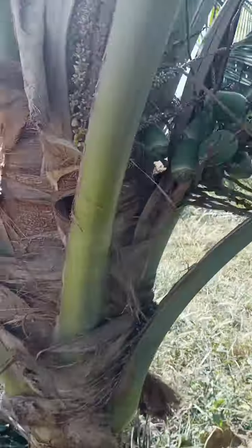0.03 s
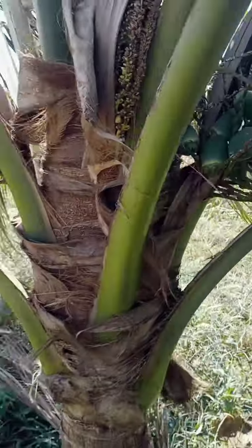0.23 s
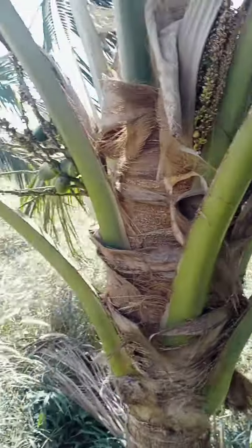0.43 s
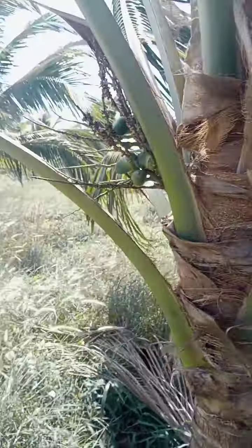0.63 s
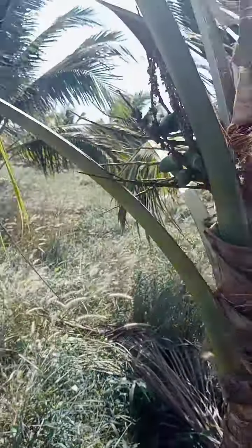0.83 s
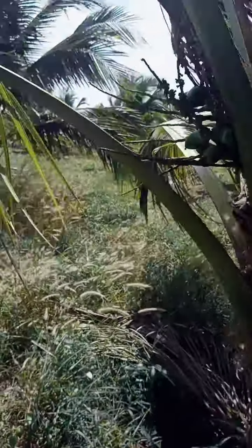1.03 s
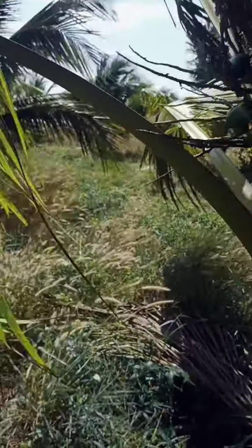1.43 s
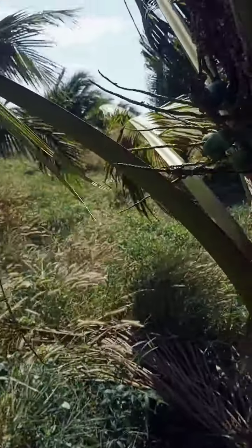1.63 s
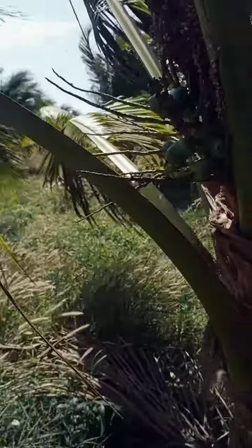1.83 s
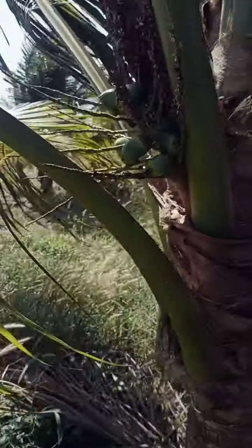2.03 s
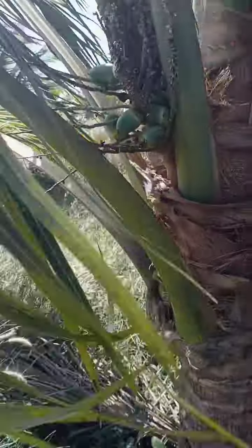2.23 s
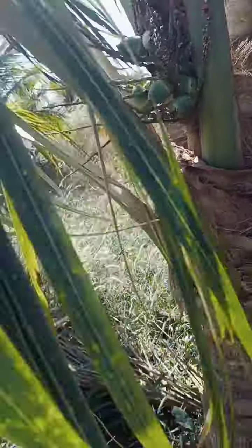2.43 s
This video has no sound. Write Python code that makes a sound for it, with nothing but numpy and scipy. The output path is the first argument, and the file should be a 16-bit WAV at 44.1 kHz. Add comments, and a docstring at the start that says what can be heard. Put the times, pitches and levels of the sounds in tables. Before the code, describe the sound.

Wind buffets the microphone in uneven, low gusts among palm fronds in a grassy field. The leaves hiss steadily, with a few close ticks and scrapes, before the strongest gust hits and dies away.

```python
"""A leafy hiss and a low rumble of wind, heard among the fronds of a coconut palm in a grassy field. Leaflets
hiss and tick as they touch one another, and a few close ones scrape or snap. Gusts sweep turbulent eddies over
the microphone, which picks up their pressure as buffeting. Twice, slow pushes of air too low to hear drive a
limiter, which ducks the rustle along with the wind."""
import sys
import numpy as np
from scipy import signal
from scipy.fft import rfft, irfft
from scipy.io import wavfile
from scipy.ndimage import uniform_filter1d, minimum_filter1d, map_coordinates

SR = 44100
rng = np.random.default_rng(int(sys.argv[2]) if len(sys.argv) > 2 else 0)


def master(y):
    """Save y as 16-bit WAV."""
    cut = np.clip(np.atleast_2d(y).T, -1, 1)
    pcm = np.round(cut * 32767)  # scale
    wavfile.write(sys.argv[1], SR, pcm.astype(np.int16))


N = 114660

# spectrum of leaflets in contact: frequency_hz, gain_db
LEAF_SPECTRUM = [(60, 8), (300, -8), (700, -3.5), (1300, -3.5), (2000, -1), (2700, -0.5), (3800, -.5),
                 (4400, -6.5), (5000, -11.5), (6200, -8.5), (7400, -6), (8500, -0.5), (9400, -6.5),
                 (10500, -14), (12500, -19.5), (15500, -20.5)]


def amp(db):
    """Amplitude ratio of a level: tenfold for every 20 dB."""
    return 10 ** (np.asarray(db) / 20)


def unit(x):
    """Normalisation to an rms of 1."""
    return x / np.sqrt(np.mean(x ** 2) + 1e-20)


def follow(rows):
    """Linear interpolation of each column of a time table, sample by sample."""
    time_s, *columns = np.transpose(rows)
    return [np.interp(np.arange(N) / SR, time_s, column) for column in columns]


def colour(x, points, scale=1):
    """Spectral shaping by a gain curve in dB, whose frequencies are multiplied by scale."""
    frequency, gain_db = np.transpose(points)
    hz = np.fft.rfftfreq(len(x), 1 / SR) + 1e-3
    return irfft(rfft(x) * amp(np.interp(np.log(hz), np.log(frequency * scale), gain_db)), len(x))


def wander(cutoff_hz):
    """Low-passed noise: a smooth random fluctuation with an rms of 1."""
    lowpass = np.exp(-(np.fft.rfftfreq(N, 1 / SR) / cutoff_hz) ** 2)
    return unit(irfft(rfft(rng.standard_normal(N)) * lowpass, N))


def bump(centre_s, half_s):
    """A Gaussian pulse that falls to 1/e at half_s from its centre."""
    return np.exp(-((np.arange(N) / SR - centre_s) / half_s) ** 2)


def contacts(per_s, spread_db, decay_s):
    """Shot noise: random touches each excite a decaying burst, a few far louder than the rest."""
    touches = (rng.random(N) < per_s / SR) * amp(spread_db * np.minimum(rng.exponential(1, N), 4))
    envelope = signal.lfilter([1], [1, -np.exp(-1 / (decay_s * SR))], touches)
    return unit(envelope * rng.standard_normal(N))


def rustle():
    """Incoherent summation: many far leaflets merge into hiss, while nearer ones tick and crackle."""
    # rustle of the crown: time_s, level_db, extra_treble_db
    crown = [(0, -36.5, -4), (.3, -35.5, -1.5), (.55, -33.5, -2), (.66, -32, 0), (.8, -32.5, -0.5),
             (.97, -34.5, 0), (1.06, -32.5, 3), (1.13, -32, 1.5), (1.22, -35.5, 1), (1.34, -36.5, 2),
             (1.43, -38, 0.5), (1.57, -38.5, -1), (1.7, -34.5, -2), (1.9, -39, -0.5), (2.1, -42, -0.5),
             (2.22, -42, -1), (2.32, -44, 2.5), (2.45, -38.5, 0), (2.6, -39, -1)]
    # spectrum of the dry crackle: frequency_hz, gain_db
    dry_spectrum = [(300, -17), (2000, -4.5), (3600, 1), (5000, -10), (8500, 2.5), (11000, -16),
                    (15000, -14)]
    level_db, treble_db = follow(crown)
    spectrogram = signal.stft(rng.standard_normal(N), nperseg=256)[2]
    # the hiss is slightly patchy in both frequency and time
    patches = uniform_filter1d(rng.standard_normal(spectrogram.shape), size=7, axis=0)
    patch_db = 0.73 * unit(uniform_filter1d(patches, size=6, axis=1))
    hiss = unit(signal.istft(spectrogram * amp(patch_db))[1][:N])
    ticks = amp(-9) * contacts(per_s=900, spread_db=6, decay_s=0.00089)  # leaflet tips touching
    crackle = contacts(per_s=70, spread_db=8, decay_s=0.0012)
    leaves = unit(colour(hiss + ticks, LEAF_SPECTRUM)) + amp(-16) * unit(colour(crackle, dry_spectrum))
    treble = signal.sosfiltfilt(signal.butter(2, 5000, "high", fs=SR, output="sos"), leaves)
    flutter_db = 0.62 * wander(cutoff_hz=30)
    return (leaves + (amp(treble_db) - 1) * treble) * amp(level_db + flutter_db)


def buffet():
    """Frozen turbulence: fixed eddies sweep over the microphone; faster air is louder and brighter."""
    # wind at the microphone: time_s, relative_pressure_db, eddy_rate_hz
    wind = [(0, -33, 150.9), (.17, -33, 150.7), (.215, -17.5, 260), (.29, -22, 259.5), (.36, -29, 169.2),
            (.45, -34, 140.4), (.55, -34.5, 151.1), (.63, -24.5, 189.2), (.72, -15.5, 210.9),
            (.79, -25, 187.2), (.88, -23.5, 240.8), (.94, -30.5, 169.1), (1.10, -27.5, 169.2),
            (1.18, -13, 226), (1.24, -27.5, 187.7), (1.31, -22.5, 230.8), (1.40, -34, 159),
            (1.52, -32, 170.5), (1.59, -36, 150.3), (1.665, -35.5, 150.8), (1.683, -16.5, 179.8),
            (1.742, -9.5, 329.4), (1.785, -2.5, 411), (1.825, -14, 319.6), (1.93, -19, 260.7),
            (2.01, -21.5, 399.8), (2.05, -11.5, 410.1), (2.10, -14, 580), (2.18, -14, 418.8),
            (2.225, -21, 379.7), (2.28, -23, 230.8), (2.335, -28, 191.9), (2.375, -40, 151.4),
            (2.47, -45.5, 151), (2.6, -45.5, 152.4)]
    # brief puffs, negative for a lull: centre_s, half_length_s, rise_db, speed_up_octaves
    puffs = [(0.106, 0.014, 6.5, -0.15), (0.393, 0.01, 10.5, -0.13), (0.494, 0.0072, 18.5, 0.63),
             (0.516, 0.013, 18.5, 0.31), (0.515, 0.0019, 7, 0.65), (.594, 0.016, 18.5, 0.24),
             (0.721, .008, 5, 0.31), (0.74, 0.003535, 16.5, 0.87), (0.798, 0.0097, 10.5, 0.28),
             (0.858, 0.0091, 4.5, -0.024), (0.889, 0.0078, 7, 0.42), (0.974, 0.0097, 14.5, 0.27),
             (1.034, .008, 15, 0.22), (1.092, 0.0089, 12.5, 0.061), (1.165, 0.0089, 1.5, 0.25),
             (1.187, 0.004, 4.5, 0.55), (1.27, 0.0049, 8, 0.68), (1.354, .007, 12.5, 0.078),
             (1.427, 0.009, 11.5, 0.018), (1.494, 0.01039, 11.5, 0.41), (1.531, 0.0081, 19.5, 0.17),
             (1.679, 0.0041, 8, 0.887), (1.8, 0.0082, 5, -0.48), (1.857, 0.0037, 3, 0.55),
             (1.965, 0.0084, 13.5, 0.36), (2.006, .012, 11, 0.22), (2.061, 0.0083, 1, 0.31),
             (2.091, 0.00765, 2.5, .15), (2.103, 0.0029, -3, 0.78), (2.116, 0.00603, 6.5, -0.39),
             (2.134, 0.0059, -7, -0.93), (2.148, 0.0048, 3, 0.77), (2.161, 0.004, 12.5, 0.91),
             (2.193, 0.01, -5.5, -0.2), (2.209, .007, 0, .7), (2.249, 0.0083, 7, .1),
             (2.309, 0.00405, 11, 0.69), (2.409, .01, 14, -0.015)]
    # turbulence spectrum: multiple_of_eddy_rate, gain_db
    eddy_spectrum = [(.1, 3.5), (.5, 2.5), (1, -2), (1.5, -10), (2.2, -18), (3.2, -31), (5, -45), (10, -97),
                     (30, -95)]
    swirl_db, swirl_octaves, evenness, steps_per_eddy = 1.53, 0.15, 0.72, 128
    wind_db, eddy_hz = follow(wind)
    puff_db, puff_octaves = sum(np.outer([rise_db, octaves], bump(centre_s, half_s))
                                for centre_s, half_s, rise_db, octaves in puffs)
    swirl = wander(cutoff_hz=132)  # quick unsteadiness of the flow
    rate_hz = eddy_hz * 2 ** (puff_octaves + swirl_octaves * swirl)
    eddies = unit(colour(rng.standard_normal(2 * N), eddy_spectrum, SR / steps_per_eddy))
    local_power = uniform_filter1d(abs(signal.hilbert(eddies)) ** 2, size=256)
    eddies = unit(eddies / local_power ** (evenness / 2))  # partly evens out chance swells
    position = np.cumsum(rate_hz) / SR * steps_per_eddy
    pressure = map_coordinates(eddies, [position], order=3, mode="wrap")
    return pressure * amp(2 + wind_db + puff_db + swirl_db * swirl)


def leaflet_strikes():
    """Friction and impact: close, stiff leaflets scrape or snap in short bursts of band-limited noise."""
    # close contacts: centre_s, half_length_s, level_db, centre_hz, width_octaves
    strikes = [(0.127, .006, -42, 13000, 0.36), (.622, 0.0023, -25.5, 2420, 0.4),
               (.666, 0.0033, -26, 2440, 0.32), (.672, 0.00091, -25.5, 6000, 1),
               (0.6733, 0.00099, -16.5, 8500, 0.29), (0.837, 0.0044, -31.5, 3500, 0.61),
               (1.035, 0.0011, -32, 9120, .6), (1.05, 0.0047, -28.5, 8200, 0.28),
               (1.06, 0.0067, -31.5, 2500, 0.2), (1.098, .002, -25, 7900, 0.8),
               (1.343, 0.0021, -45, 13960, 0.28), (1.619, 0.0031, -35.5, 6040, 0.68),
               (1.855, 0.0028, -34, 4977, 0.67), (1.95, .005, -36.5, 3992, 0.65),
               (1.996, 0.0019, -47, 13900, 0.21)]
    hz = np.fft.rfftfreq(N, 1 / SR) + 1
    sound = np.zeros(N)
    for centre_s, half_s, level_db, centre_hz, width_octaves in strikes:
        band = np.exp(-.5 * (np.log2(hz / centre_hz) / width_octaves) ** 2)
        swell = bump(centre_s, half_s)
        scrape = swell * irfft(rfft(colour(rng.standard_normal(N), LEAF_SPECTRUM)) * band, N)
        sound += amp(level_db) * scrape * np.linalg.norm(swell) / (np.linalg.norm(scrape) + 1e-12)
    return sound


def surges():
    """Infrasound: slow pushes of air, too low to hear, that load the limiter."""
    # pressure pulses: centre_s, half_length_s, peak_db
    pushes = [(1.768, 0.039, 4.5), (2.15, 0.019, 6.5)]
    return sum(amp(peak_db) * bump(centre_s, half_s) for centre_s, half_s, peak_db in pushes)


def scene():
    """Superposition: the pressures of wind and leaves add at one microphone."""
    return (buffet() + rustle() + leaflet_strikes() + surges())[None]


def record(dry):
    """Look-ahead limiting: peaks turn the whole sound down; filters then cut the bass and top treble."""
    ceiling_db, recovery_db_per_s = 2, 167
    bass_cut_hz, treble_cut_hz = 81.7, 15700
    excess_db = np.maximum(20 * np.log10(abs(dry[0]) + 1e-9) - ceiling_db, 0)
    recovery_db = np.arange(N) * recovery_db_per_s / SR
    duck_db = recovery_db - np.maximum.accumulate(excess_db + recovery_db)
    # the gain eases down over the 4 ms before a peak
    limited = dry * amp(uniform_filter1d(minimum_filter1d(duck_db, size=180), size=180))
    thinned = signal.sosfilt(signal.butter(4, bass_cut_hz, "high", fs=SR, output="sos"), limited)
    lowpass = signal.firwin(511, treble_cut_hz, window=("kaiser", 9), fs=SR)
    return signal.oaconvolve(thinned, lowpass[None], "same")


dry = scene()
out = record(dry)
master(out)
```